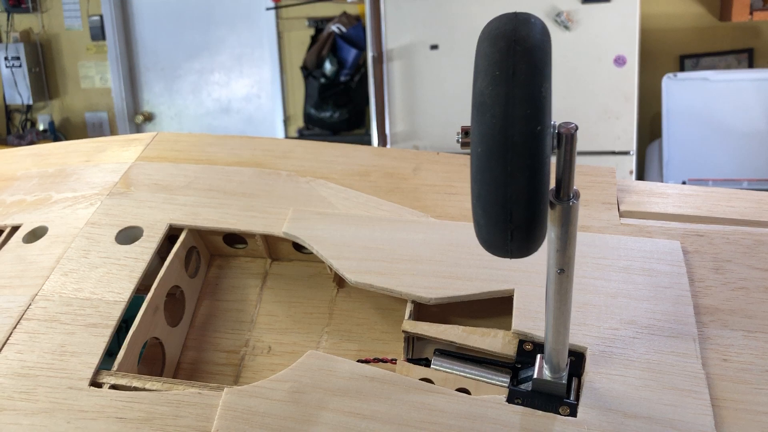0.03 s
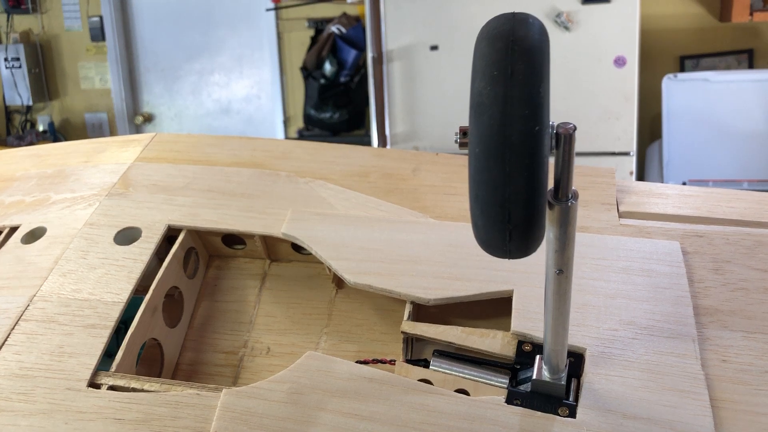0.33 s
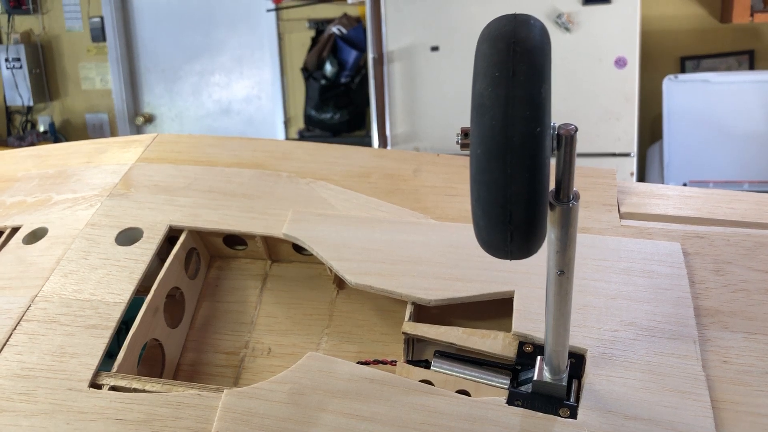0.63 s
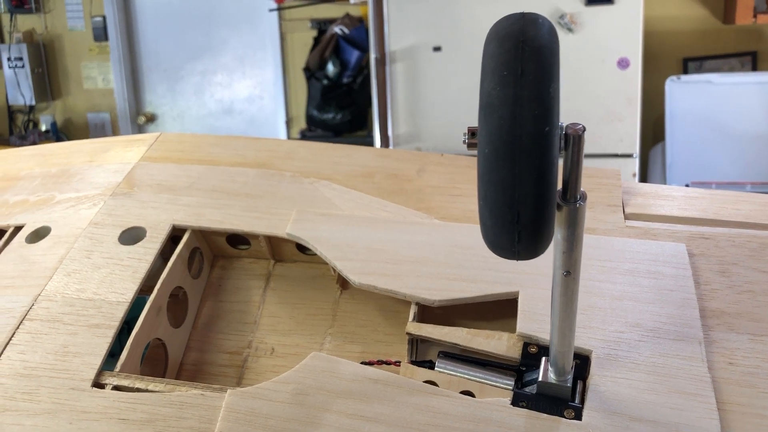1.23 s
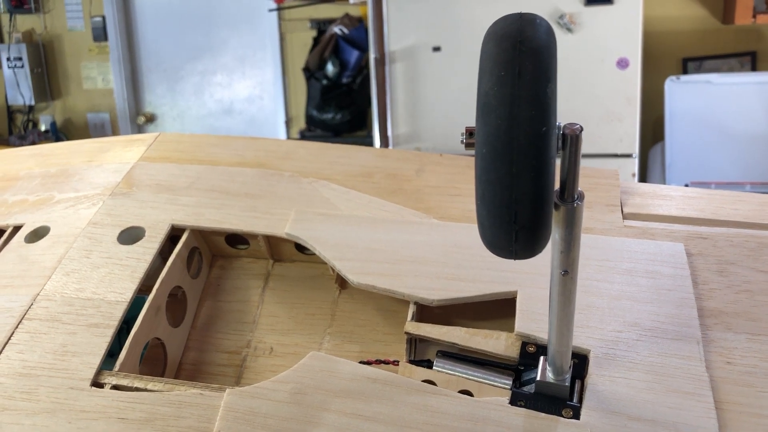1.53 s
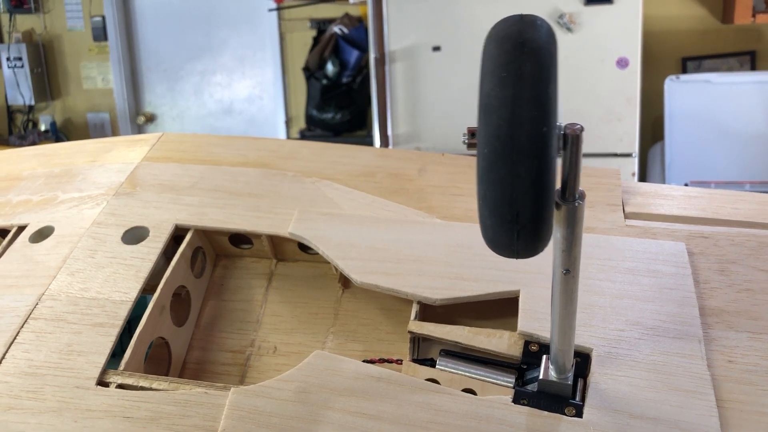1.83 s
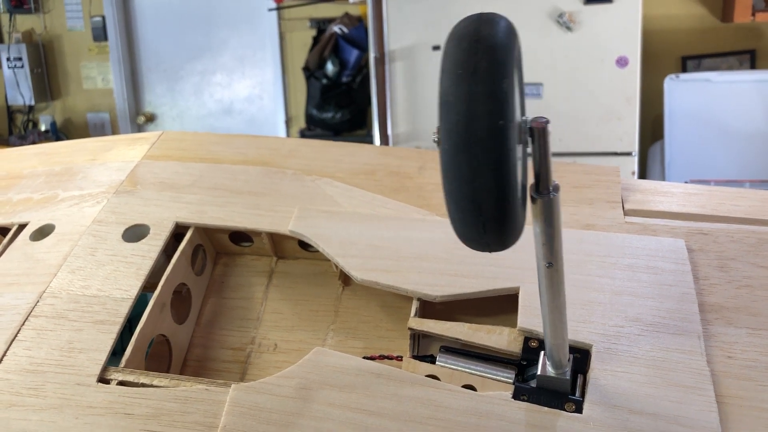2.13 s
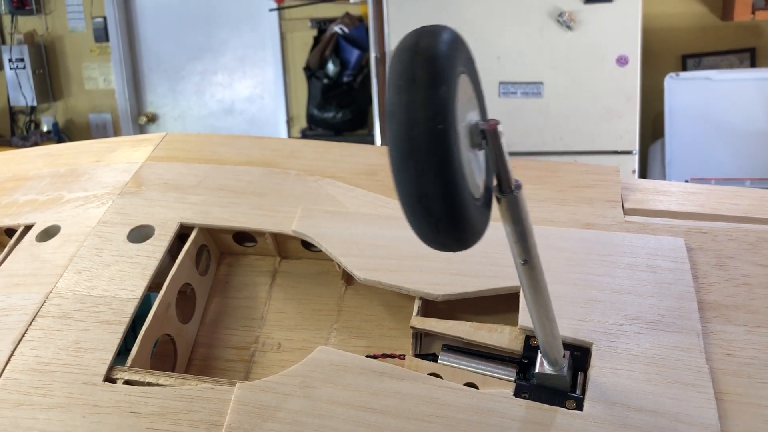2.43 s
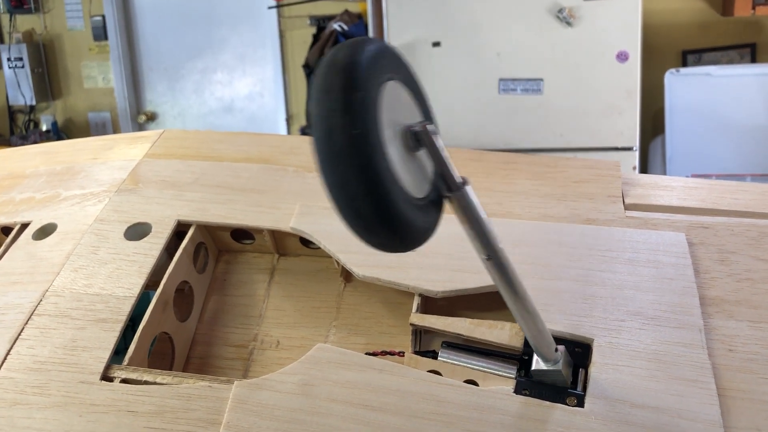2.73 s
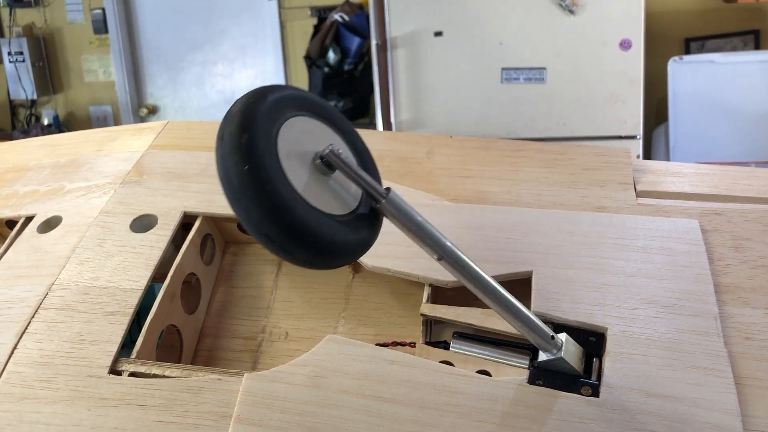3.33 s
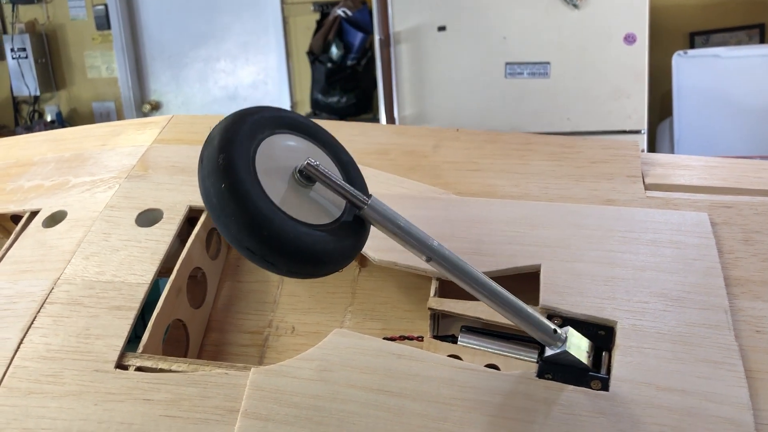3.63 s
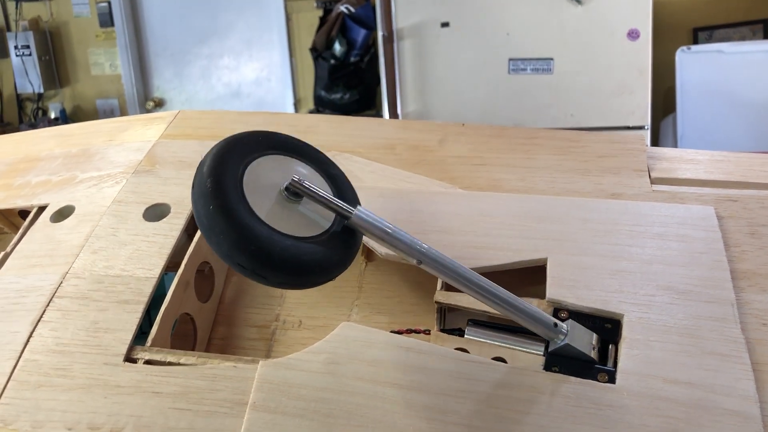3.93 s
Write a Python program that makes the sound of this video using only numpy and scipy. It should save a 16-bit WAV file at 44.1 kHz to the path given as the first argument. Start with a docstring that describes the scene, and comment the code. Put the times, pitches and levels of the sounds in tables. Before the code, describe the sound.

A small geared electric motor whines and grinds as it retracts a model plane's landing gear. A switch clicks first, then the motor jolts into motion, its gears chattering in quick pulses over a quiet workshop's faint hum.

```python
"""A quiet workshop hums with mains power and dull room noise. After about a second a switch clicks.
Half a second later a small geared motor spins up with a jolt and folds a model's landing gear
into its wooden wing. The motor whines while its gears sing and grind. Then, under load,
the drive screw binds (sticks briefly) about six times a second, making the gears chatter."""
import sys
import numpy as np
from scipy import signal
from scipy.fft import rfft, irfft
from scipy.io import wavfile

SR = 44100
rng = np.random.default_rng(int(sys.argv[2]) if len(sys.argv) > 2 else 0)


def wav_record(signal):
    """Record a signal, one row per channel, as 16-bit PCM in the file named by sys.argv[1]."""
    frames = np.transpose(np.atleast_2d(signal))
    bounded = np.clip(frames, -1, 1)
    # unit amplitude maps onto the largest positive 16-bit level
    quanta = np.round(bounded * 32767).astype(np.int16)
    wavfile.write(sys.argv[1], SR, quanta)


N = 176400
T = np.arange(N) / SR
MOTOR_START_S, MOTOR_ATTACK_S = 1.489, 0.0039

# How hard the screw works. Each row: time in seconds, load from 0 (light) to 1 (heavy).
SCREW_LOAD = [(1.8, 0.8), (1.88, 0.93), (2.45, 0.65), (2.62, 0.01), (3.06, 0.64), (3.13, 0.9)]
# The screw sticks. Each row: start and length in seconds, then chatter, knock and swell in dB.
SCREW_BINDS = [(1.846, 0.055, -44, -47.5, -40), (1.98, 0.062, -47, -70, -47), (2.157, 0.052, -43, -53, -43),
               (2.331, 0.04, -41.5, -53, -41.5), (2.503, 0.036, -44, -66, -45.5),
               (2.935, 0.035, -41, -40, -70), (3.111, 0.034, -44.5, -39.5, -41),
               (3.162, 0.058, -45.5, -41.5, -37), (3.307, 0.076, -48, -42.5, -36),
               (3.485, 0.075, -46, -47.5, -35.5), (3.651, 0.071, -47, -48, -34.5),
               (3.823, 0.073, -45.5, -45.5, -32), (3.989, .08, -43, -45, -42)]


def from_db(db):
    """Turn decibels into a factor to multiply by."""
    return 10 ** (np.asarray(db) / 20)


def rms_one(x):
    """Scale a sound to an average strength (rms) of 1."""
    return x / np.sqrt(np.mean(x ** 2) + 1e-20)


def curve(rows):
    """Join rows of time and value with straight lines."""
    return np.interp(T, *np.transpose(rows))


def drift(rate):
    """A smooth random wander of about 1 either way; a higher rate wanders faster."""
    r = np.exp(-40 * np.pi * rate / SR)
    slow = signal.lfilter([1], [1, -2 * r, r * r], rng.standard_normal(N // 20 + 2002))[2000:]
    return np.interp(np.arange(N) / 20, np.arange(len(slow)), rms_one(slow))


def colour(x, spectrum):
    """Shape a sound's bass and treble, fading below the spectrum's first row; strength 1."""
    hz, db = np.transpose(spectrum)
    f = np.maximum(np.fft.rfftfreq(N, 1 / SR), 1)
    gain = from_db(np.interp(np.log(f), np.log(hz), db)) * np.minimum(f / hz[0], 1) ** 2
    return rms_one(irfft(rfft(x) * gain, N))


def gate(start, length, attack, release):
    """A level that rises, holds and dies away; all times are in seconds."""
    return np.clip((T - start) / attack, 0, 1) * np.exp(-np.maximum(T - start - length, 0) / release)


def tone(cycles, flutter_db, wobble, rate):
    """A pure tone whose level flutters and whose pitch wobbles."""
    level = from_db(flutter_db * drift(rate))
    return rms_one(level * np.sin(2 * np.pi * (cycles + rng.random()) + wobble * drift(rate)))


def workshop():
    """The background: steady mains hum over dull room noise."""
    # Each row: pitch of a hum tone in Hz, level in dB.
    hum_tones = [(101.3, -54), (122, -65), (558, -72), (703, -74)]
    # The room noise. Each row: frequency in Hz, relative level in dB.
    air_spectrum = [(15, -70), (25, -40), (69, -11), (84, -12), (104, -5.5), (129, -13.5), (160, -9),
                    (297, -11.5), (523, -23.5), (567, -19), (614, -27.5), (684, -22.5), (782, -23),
                    (1270, -32), (15500, -56.5)]
    hum = sum(from_db(db) * tone(hz * T, flutter_db=1, wobble=0.16, rate=8.2) for hz, db in hum_tones)
    return hum + from_db(-56) * colour(rng.standard_normal(N), air_spectrum)


def room(x, split_hz=3500, low_fade_s=0.25, treble_fade_s=0.16, first_echo_s=0.0031):
    """The workshop's echoes blur into a short tail whose treble dies sooner."""
    t = T[:SR // 2]
    noise = rng.standard_normal(len(t))
    low = signal.sosfilt(signal.butter(1, split_hz, fs=SR, output="sos"), noise)
    tail = low * from_db(-60 * t / low_fade_s) + (noise - low) * from_db(-4 - 60 * t / treble_fade_s)
    tail *= t > first_echo_s
    return signal.fftconvolve(x, tail / np.sqrt(np.sum(tail ** 2)) / 2)[:N]


def ring(x, hz, fade_s):
    """A struck part rings at one pitch, falling 60 dB in fade_s seconds."""
    r, w = from_db(-60 / (fade_s * SR)), 2 * np.pi * hz / SR
    return signal.lfilter([0, np.sin(w)], [1, -2 * r * np.cos(w), r * r], x + 1e-18)


def switch(low_cut_hz=420):
    """A switch snaps over: a few quick contacts, each a crack and a short ring of its case."""
    # Each row: time of a contact in seconds, level in dB.
    contacts = [(.954, -20), (0.9573, -9), (.9587, 3.5), (0.9613, -2.5), (.9626, -10)]
    # The case rings. Each row: pitch in Hz, relative level in dB, seconds to fall 60 dB.
    case_tones = [(533, -34, 0.041), (747, -38.5, 0.04), (1140, -32.5, 0.047), (1900, -26.5, 0.02),
                  (2030, -29, 0.018), (2530, -35, 0.015), (3550, -28, .012), (5330, -26.5, 0.0049)]
    # The crack. Each row: frequency in Hz, relative level in dB.
    crack_spectrum = [(500, 0.5), (2000, 1.5), (6500, -9.5), (8500, -1.5), (10500, -9.5), (12000, -3),
                      (16000, -21)]
    hits, crack_level = np.zeros(N), 0
    for start, db in contacts:
        hits[int(start * SR)] += from_db(db)
        crack_level += from_db(db - 24) * gate(start, 0, attack=1 / SR, release=0.0011)
    click = crack_level * colour(rng.standard_normal(N), crack_spectrum)
    for k, (hz, db, fade_s) in enumerate(case_tones):
        click += from_db(db) * ring(hits, hz, fade_s) * (-1) ** k
    click = signal.sosfilt(signal.butter(2, low_cut_hz, "high", fs=SR, output="sos"), click)
    return click + from_db(-5.5) * room(click)


def gearbox(x, direct_db=-2.5):
    """The gearbox and its mount ring at their own pitches; some sound passes straight through."""
    # Each row: ringing pitch in Hz, width in Hz, level in dB.
    resonances = [(666, 113, 3.5), (824, 24, -7), (1077, 33, 3), (1412, 54, 3.5), (1560, 44, 4),
                  (2000, 190, 4.5), (2690, 280, -2), (3200, 160, -0.5), (4060, 92, 0), (4640, 320, 2),
                  (7030, 230, 3.5)]
    out = from_db(direct_db) * x
    for hz, width, db in resonances:
        r = np.exp(-np.pi * width / SR)
        feedback = [1, -2 * r * np.cos(2 * np.pi * hz / SR), r * r]
        out += from_db(db) * signal.lfilter(np.array([1, 0, -1]) * (1 - r * r) / 2, feedback, x)
    return out


def teeth(cycles, spectrum, teeth_per_cycle=2.14):
    """Gear teeth hit with uneven force and rub, ringing through the gearbox; strength 1."""
    tooth_count = np.floor(cycles * teeth_per_cycle + .15 * drift(400))
    hits = (np.diff(tooth_count, prepend=0) > 0) * rng.choice([-1, 1], N)
    force = from_db(rng.uniform(-6.3, 4.5, N))
    rubbing = from_db(1) * rng.standard_normal(N)
    return colour(gearbox(rms_one(hits * force) + rubbing), spectrum)


def brushes(cycles):
    """The motor's brushes, its sliding contacts, hiss with the same rough texture as the gears."""
    # Each row: time in seconds, hiss level in dB.
    levels = [(1.49, -60), (1.54, -50), (1.58, -64), (1.62, -77), (1.8, -65), (1.9, -62), (2.25, -57),
              (2.5, -63), (2.8, -70), (3.1, -71), (4.0, -64)]
    # Each row: frequency in Hz, relative level in dB.
    spectrum = [(5000, 21.5), (8000, -62), (10500, 9), (12500, 17.5), (15500, 14)]
    return from_db(curve(levels)) * teeth(cycles, spectrum)


def grinding(cycles, treble_hz=2950):
    """The teeth grind steadily and sound brighter under load."""
    # Each row: frequency in Hz, relative level in dB.
    spectrum = [(200, -7.5), (500, -8), (800, -6), (1350, -0.5), (1750, -8.5), (2300, -11.5), (2800, -6),
                (4200, -13), (5500, -10.5), (7000, -12), (9500, -15), (15500, -36)]
    noise = teeth(cycles, spectrum)
    low = signal.sosfilt(signal.butter(1, treble_hz, fs=SR, output="sos"), noise)
    return low + from_db(-14.5 * (1.5 - curve(SCREW_LOAD))) * (noise - low)


def starting_jolt(cycles):
    """The gears start with a sharp jolt and a short surge of tooth noise."""
    # Each row: frequency in Hz, relative level in dB.
    spectrum = [(200, -22), (350, 9), (700, -17), (1100, 5), (1600, -11), (2700, -4.5), (5000, -15.5),
                (8000, -18), (15000, -36)]
    jolt = from_db(-37.5) * gate(MOTOR_START_S, MOTOR_ATTACK_S, MOTOR_ATTACK_S, release=0.0054)
    surge = from_db(-37) * gate(MOTOR_START_S, 0.074, MOTOR_ATTACK_S, release=0.028)
    return (jolt + surge) * teeth(cycles, spectrum)


def gears(cycles):
    """The gears jolt, then grind and sing; they chatter and knock whenever the screw binds."""
    # Each row: time in seconds, grinding level in dB.
    grind_levels = [(1.49, -34.5), (1.6, -49.5), (1.67, -52.5), (1.82, -49.5), (1.9, -45), (2.4, -45),
                    (2.7, -48), (2.86, -52), (3.07, -51), (3.13, -44.5), (3.6, -43.5), (4.0, -43)]
    # Bright chatter and dull knock. Each row: frequency in Hz, relative level in dB.
    chatter_spectrum = [(300, -21), (1000, -16), (1500, -8), (2200, -1), (3200, 6.5), (4200, 1.5),
                        (5200, -1.5), (7000, -5.5), (9000, -13.5), (12000, -32), (15500, -39)]
    knock_spectrum = [(150, -18), (300, 0), (450, -10.5), (650, -2.5), (1100, 4.5), (1500, -1), (2000, -14),
                      (3000, -69), (8000, -31)]
    # Tones of meeting teeth. Each row: multiple of the motor's pitch, then dB relative to
    # the tooth pressure, to the chatter and to the starting strain.
    gear_tones = [(1.367, -11, -16.5, -68), (1.66, -25, -15, -64), (2.12, -6.5, -11, -64),
                  (2.406, -14.5, -21, -44), (4.29, -12.5, -4, -58), (5.275, -21.5, -5.5, -29),
                  (6.27, -23, -6.5, -39), (10.56, -16, -21, -37.5), (15.74, -43, -31, -47),
                  (25, -38, -36, -48.5)]
    grind, chatter, knock = from_db(curve(grind_levels)), 0, 0
    for start, length, chatter_db, knock_db, _ in SCREW_BINDS:
        burst = gate(start, length, attack=0.0075, release=0.012)
        chatter += from_db(chatter_db) * burst
        knock += from_db(knock_db) * burst
    out = grind * grinding(cycles)
    out += chatter * teeth(cycles, chatter_spectrum) + knock * teeth(cycles, knock_spectrum)
    out += starting_jolt(cycles)
    strain = gate(MOTOR_START_S, 0.067, attack=0.091, release=0.0074)
    pressure = grind * from_db(-6.5 * (1 - curve(SCREW_LOAD)))
    for multiple, run_db, bind_db, start_db in gear_tones:
        out += from_db(start_db) * strain * tone(multiple * cycles, flutter_db=3, wobble=.7, rate=150)
        out += from_db(run_db) * pressure * tone(multiple * cycles, flutter_db=4.5, wobble=.46, rate=15)
        out += from_db(bind_db) * chatter * tone(multiple * cycles, flutter_db=3, wobble=.48, rate=31)
    return out


def whine(cycles, sag_hz=6):
    """The motor's base tone and overtones; each bind swells the base tone and drags its pitch down."""
    # The base tone between binds, and the overtones together. Each row: time in seconds, level in dB.
    base_levels = [(1.49, -69), (1.55, -35.5), (1.59, -37), (1.62, -43.5), (1.66, -39), (1.83, -39),
                   (1.93, -74), (2.1, -54.5), (2.45, -48.5), (2.6, -45.5), (2.83, -43.5), (2.89, -49.5),
                   (2.98, -35.5), (3.07, -44), (3.26, -49.5), (3.44, -44.5), (4.0, -46)]
    overtone_levels = [(1.49, -62), (1.64, -58), (1.69, -47), (1.8, -52), (1.9, -42), (2.35, -41.5),
                       (2.55, -47.5), (2.62, -51), (2.78, -50.5), (2.87, -52.5), (3.05, -50), (3.12, -42),
                       (3.7, -42), (4.0, -44)]
    # Overtones under light and heavy load. Each row: multiple of the pitch, relative level in dB.
    light = [(2, 2), (3, -1.5), (4, -4.5), (5, -1.5), (6, -13), (7, -17.5), (8, -17), (9, -19.5), (10, -27),
             (11, -39), (12, -45), (13, -65), (15, -26), (18, -25), (24, -29)]
    heavy = [(2, -13.5), (3, -2), (4, -10), (5, -19), (6, -19), (7, -22.5), (8, -17), (9, -18.5),
             (10, -14.5), (11, -40), (12, -27), (13, -21.5), (15, -38), (18, -44), (24, -42)]
    load, overtones = curve(SCREW_LOAD), 0
    for (k, light_db), (_, heavy_db) in zip(light, heavy):
        level = from_db(light_db + load * (heavy_db - light_db))
        overtones += level * tone(k * cycles, flutter_db=3.46, wobble=0.073 * k, rate=17)
    swell, lag, lead_s = 0, 0, 0.0163  # the swell comes just before the chatter
    for start, length, _, _, swell_db in SCREW_BINDS:
        bind = gate(start - lead_s, length + lead_s, attack=0.0278, release=0.011)
        swell += from_db(swell_db) * bind
        lag += sag_hz * np.cumsum(bind) / SR
    base = (from_db(curve(base_levels)) + swell) * tone(cycles - lag, flutter_db=2, wobble=.33, rate=35)
    dip = 1 / (1 + swell / from_db(-22.5))  # the overtones give way to the swell
    return base, from_db(curve(overtone_levels)) * dip * overtones


def motor(spin_up_s=0.044, lead_s=0.008):
    """The motor comes quickly up to speed, and that speed drives both the whine and the gears."""
    # Running speed. Each row: time in seconds, pitch of the whine in Hz.
    speed = [(1.68, 654.5), (1.83, 652.8), (1.9, 651), (2.24, 646.8), (2.39, 648.5), (2.48, 650.3),
             (2.63, 654.1), (2.8, 655.2), (2.9, 658.9), (2.97, 650.4), (3.06, 656.9), (3.14, 653.9),
             (3.3, 652.5), (3.57, 654), (3.64, 649.5), (3.74, 652.3), (3.82, 652.3), (3.94, 653.8)]
    spin_up = 1 - np.exp(-np.maximum(T - MOTOR_START_S + lead_s, 0) / spin_up_s)
    hz = curve(speed) * spin_up * (1 + .0012 * drift(20))
    cycles = np.cumsum(hz) / SR  # waves of the base tone so far
    on = np.clip((T - MOTOR_START_S) / MOTOR_ATTACK_S, 0, 1)
    base, overtones = whine(cycles)
    drive = on * (overtones + brushes(cycles) + gears(cycles))
    return on * base + drive + from_db(-16) * room(drive)


def scene():
    """Switch, motor and workshop together in one channel."""
    return (switch() + motor() + workshop())[None]


def record(dry, start_s=0.082, cutoff_hz=15900):
    """Let the sound in after a moment of silence and cut the highest treble."""
    opened = dry * np.clip((T - start_s) / 0.004, 0, 1)
    return signal.sosfilt(signal.ellip(10, .1, 80, cutoff_hz, fs=SR, output="sos"), opened)


dry = scene()
out = record(dry)
wav_record(out)
```